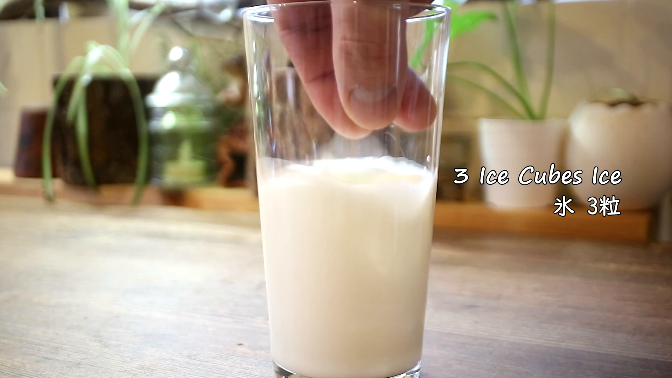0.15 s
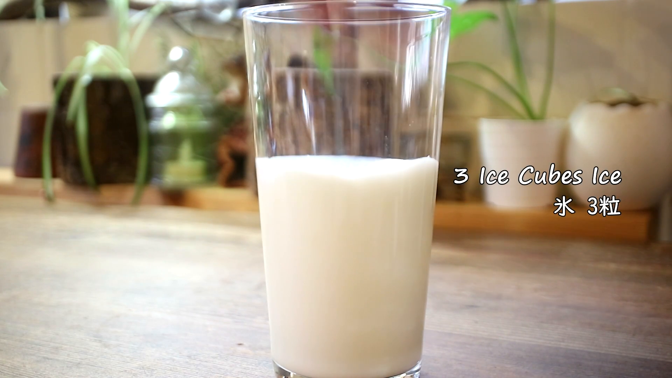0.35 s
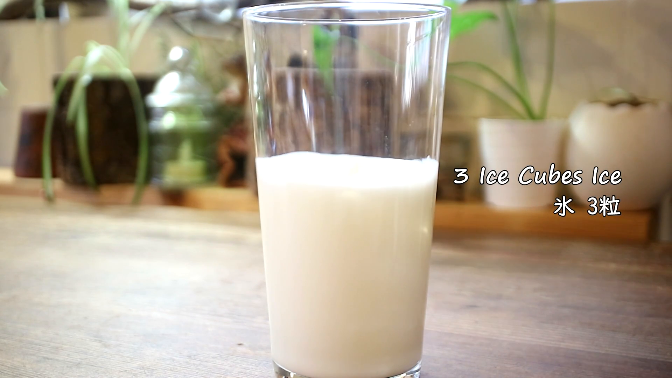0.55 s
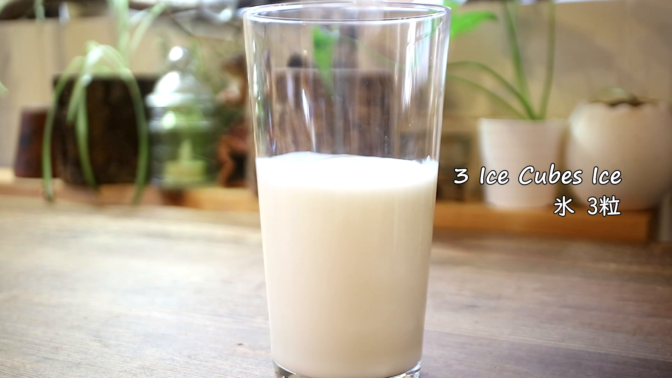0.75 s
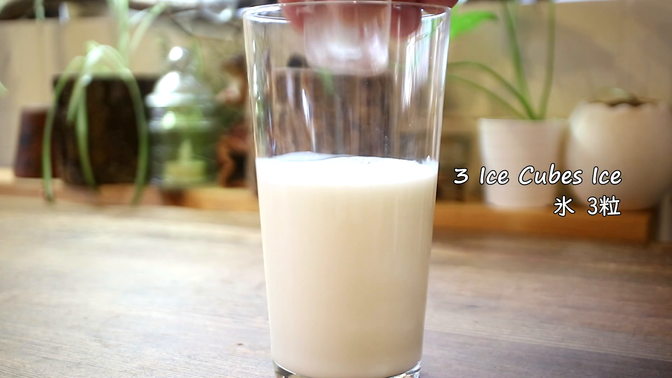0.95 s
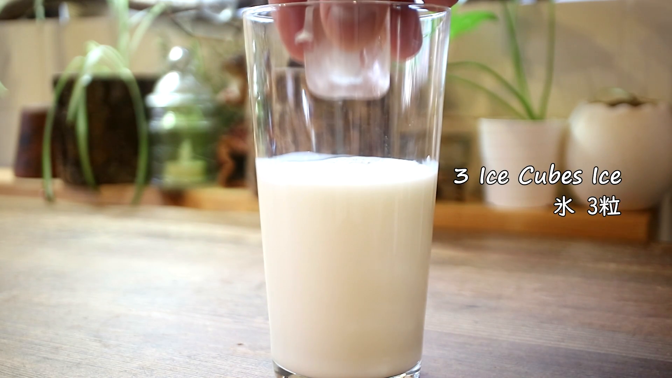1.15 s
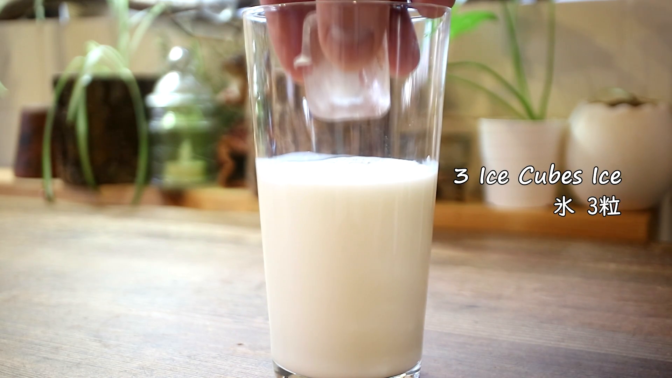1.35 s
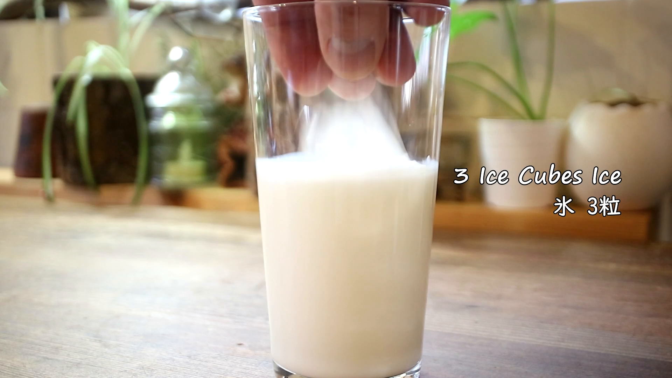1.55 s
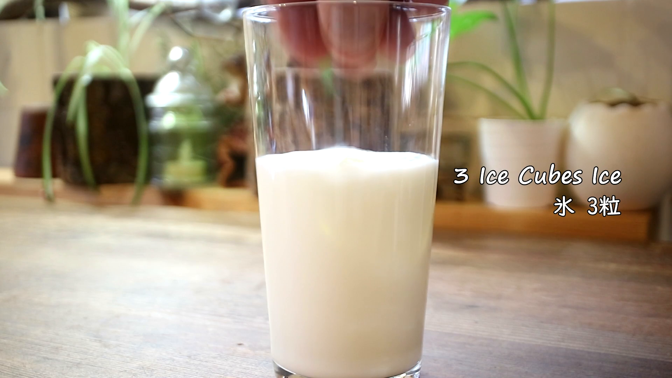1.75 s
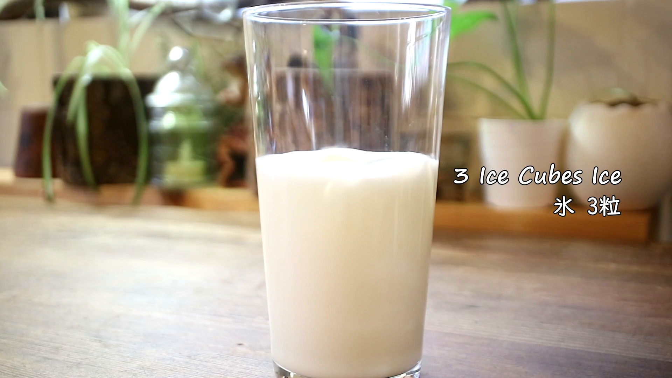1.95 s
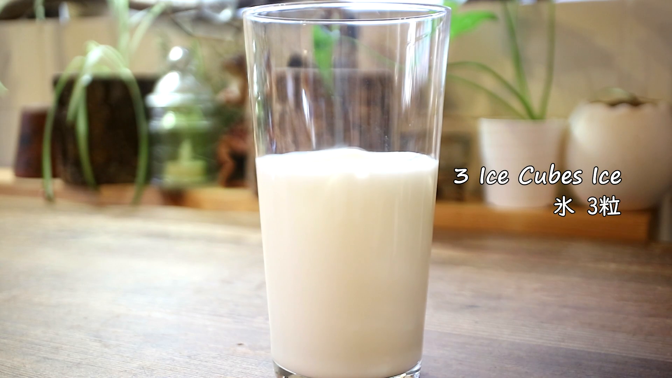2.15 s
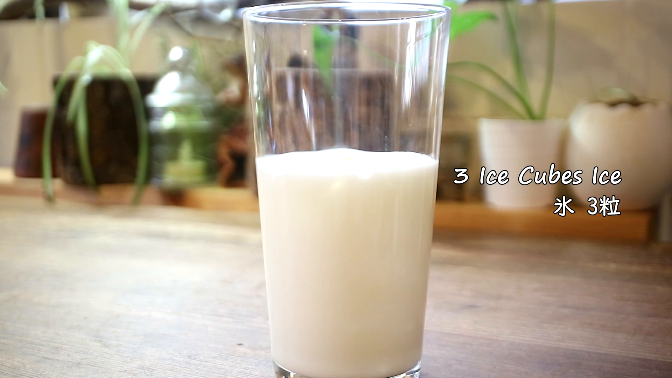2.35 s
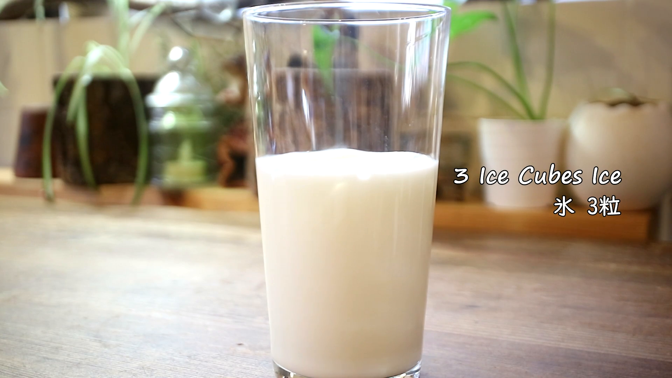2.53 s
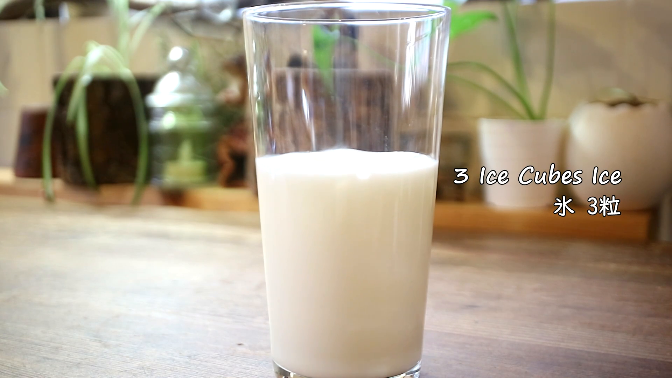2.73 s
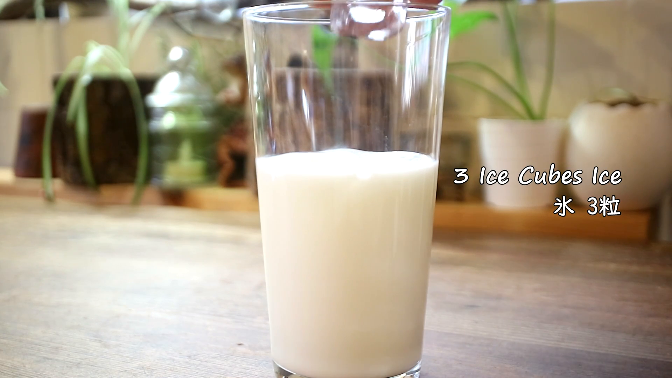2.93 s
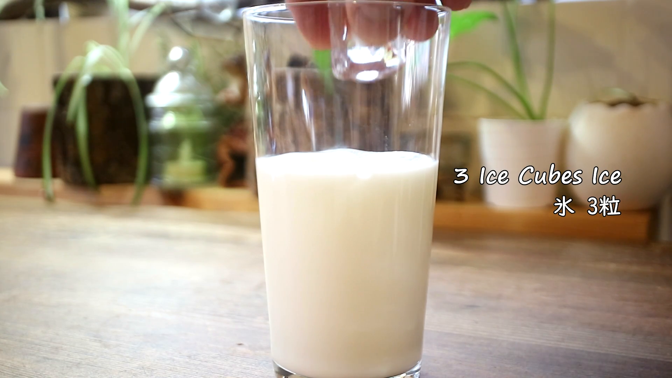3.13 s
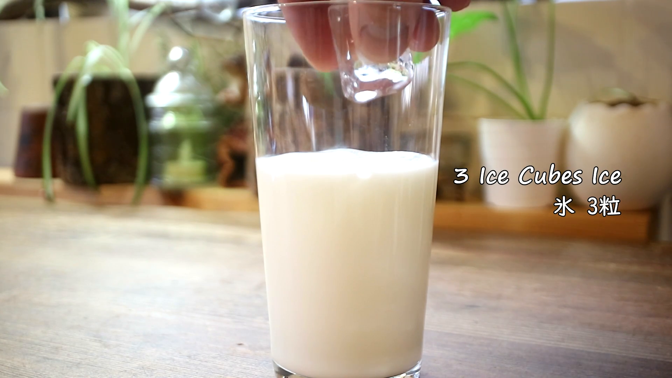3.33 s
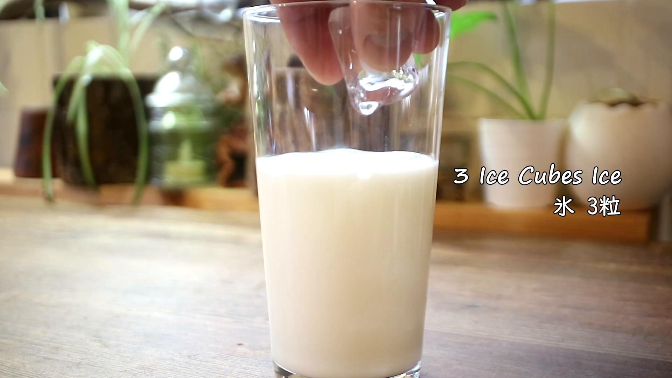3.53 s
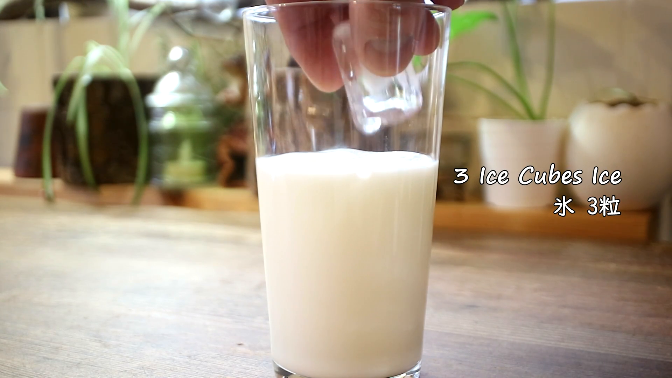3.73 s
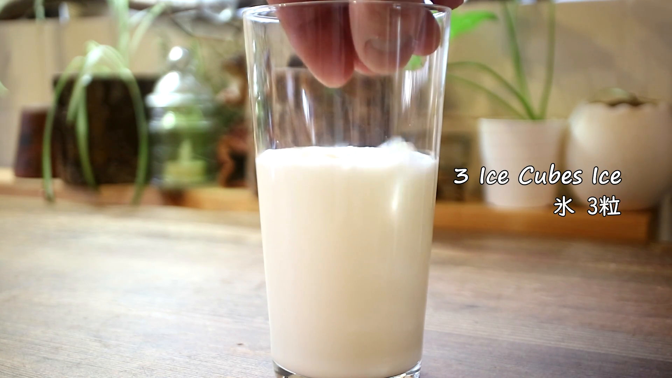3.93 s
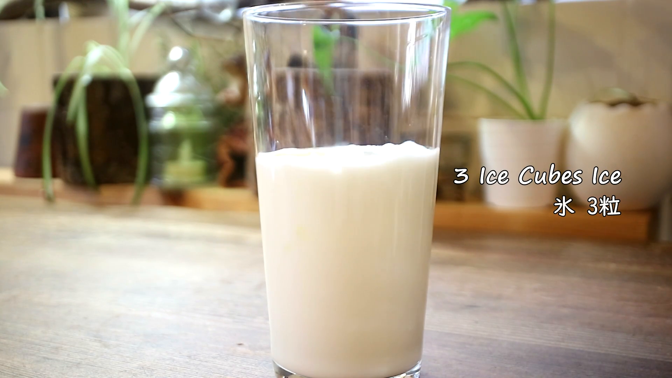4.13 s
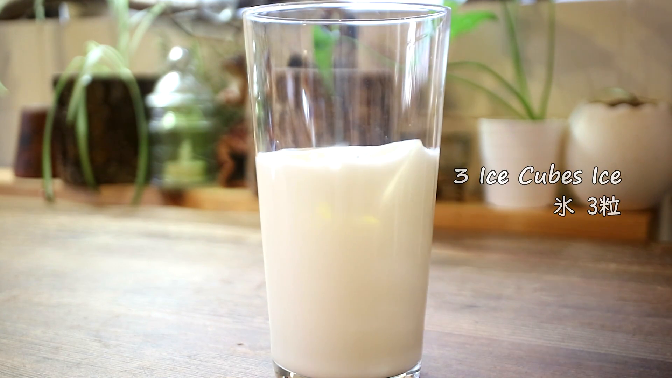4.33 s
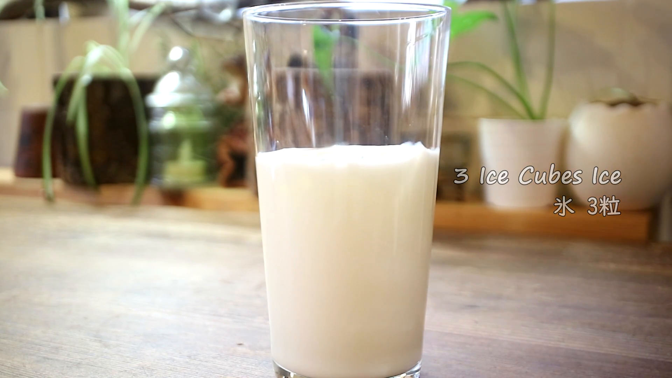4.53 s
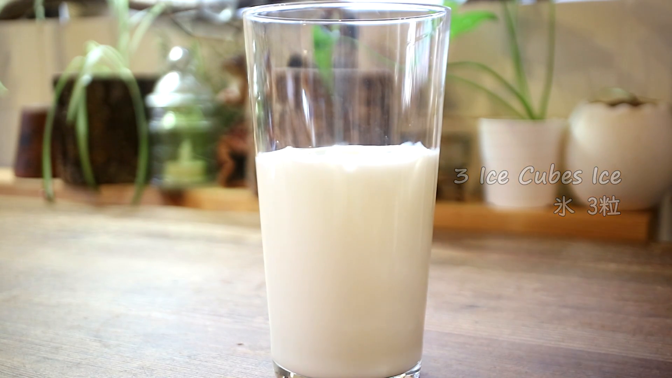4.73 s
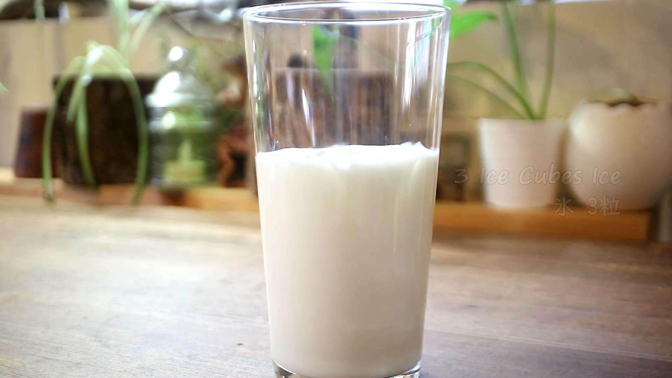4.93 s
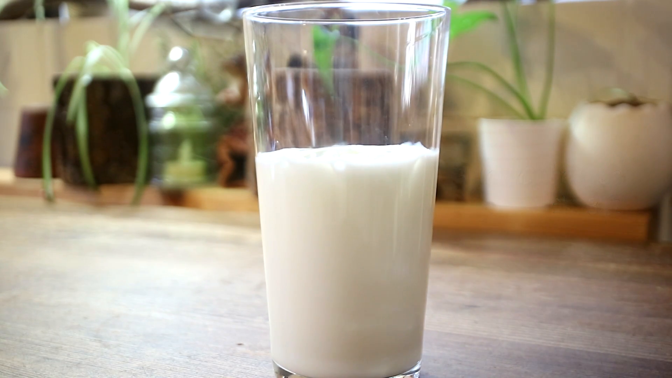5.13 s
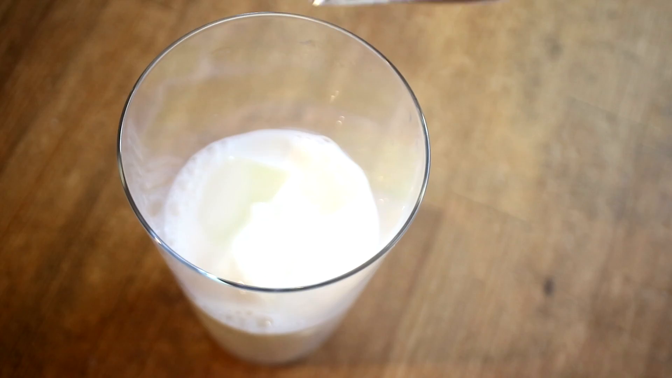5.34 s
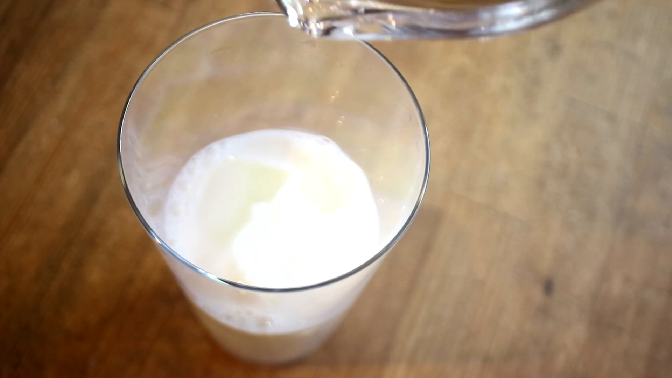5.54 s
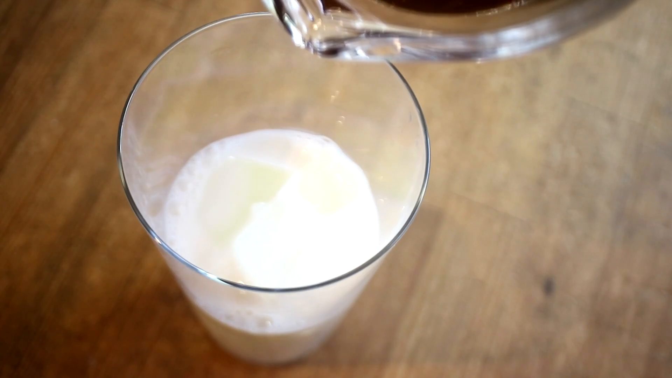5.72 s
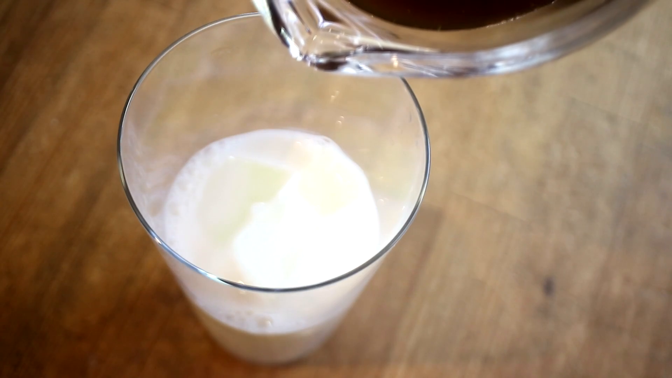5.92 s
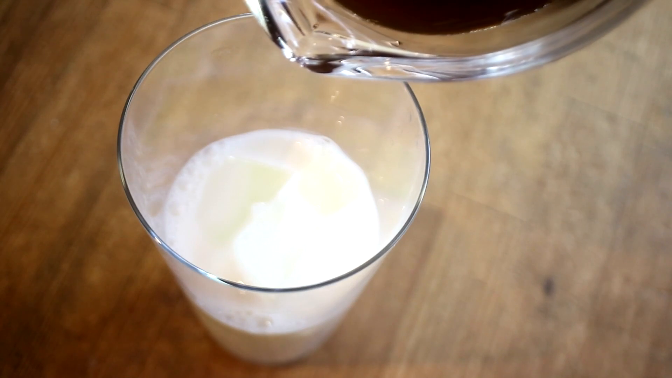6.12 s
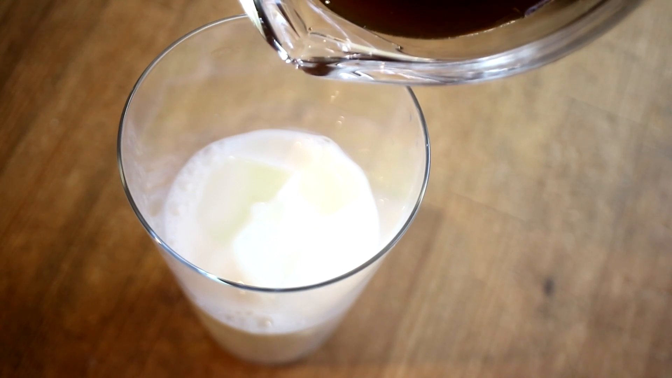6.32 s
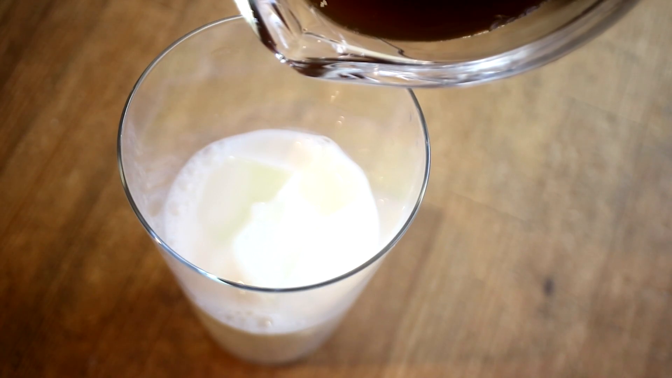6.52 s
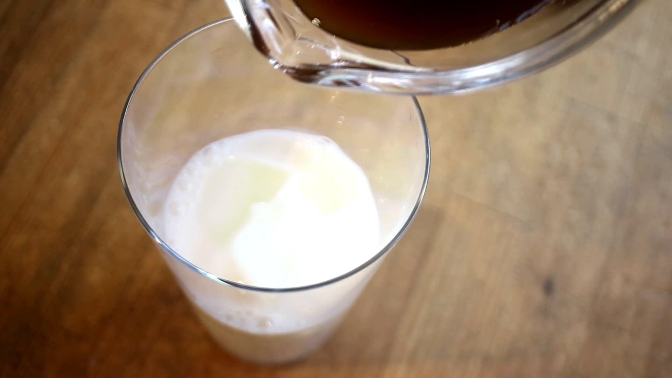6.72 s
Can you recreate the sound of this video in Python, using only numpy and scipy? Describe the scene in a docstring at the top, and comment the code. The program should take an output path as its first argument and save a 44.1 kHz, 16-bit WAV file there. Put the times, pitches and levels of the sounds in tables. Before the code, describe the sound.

Three ice cubes drop one at a time into a tall glass of milk. Each lands with a small splash and a quick cluster of bright, ringing clinks, then bobs against the glass with softer ticks while foam fizzes faintly. The second is the loudest and the third rattles longest. A few dull, distant knocks follow. The microphone is close, in a quiet kitchen with a low appliance hum.

```python
"""Three ice cubes splash one by one into a tall glass of milk on a kitchen table, each clinking as it bobs.
The glass rings on, swelling and dipping between clinks. The rising milk loads the glass and
flattens its pitch; the slosh makes it waver. Foam fizzes after each plunge.
Behind it, a quiet room with appliance hum and a few dull knocks, heard by a close mid-side microphone."""
import sys
import numpy as np
from scipy import signal
from scipy.fft import rfft, irfft, next_fast_len
from scipy.io import wavfile

SR = 44100
rng = np.random.default_rng(int(sys.argv[2]) if len(sys.argv) > 2 else 0)


def inscribe(sig):
    """Save sig as 16-bit PCM at rate SR to the path in sys.argv[1].

    A 1-D sig is mono; a 2-D sig holds one channel per row.
    Samples are clipped to [-1, 1] before scaling.
    """
    pcm = np.round(np.clip(np.atleast_2d(sig).T, -1, 1) * 32767)
    wavfile.write(sys.argv[1], SR, pcm.astype(np.int16))


N = 298689


def amp(db):
    return 10 ** (np.asarray(db) / 20)


def unit_rms(x):
    return x / np.sqrt(np.mean(x ** 2) + 1e-20)


def rise(t, rise_s):
    return 1 - np.exp(-t / rise_s)


def decay(t, db, t60_s):
    return amp(db - 60 * t / t60_s)


def spread(rows, width):
    """Three rows to stereo: centre plus width times left and right."""
    return rows[0] + width * rows[1:]


def along(points, hz):
    """Interpolate (freq_hz, value) points on a log axis."""
    freq_hz, value = np.transpose(points)
    return np.interp(np.log(hz + 1), np.log(freq_hz + 1), value)


def filtered(x, response):
    """Apply a frequency response."""
    size = next_fast_len(x.shape[-1] + 8192)
    return irfft(rfft(x, size) * response(np.fft.rfftfreq(size, 1 / SR)), size)[..., :x.shape[-1]]


def noise(shape, spectrum):
    """Coloured noise, rms 1."""
    return unit_rms(filtered(rng.standard_normal(shape), lambda hz: amp(along(spectrum, hz))))


def wobble(count, rate_hz):
    """Random curves, linear between knots."""
    knots = rng.standard_normal((count, int(N * rate_hz / SR) + 2))
    return np.array([np.interp(np.arange(N) * rate_hz / SR, np.arange(len(k)), k) for k in knots])


def add(into, start_s, sound):
    part = into[:, round(start_s * SR):][:, :sound.shape[-1]]
    part += sound[..., :part.shape[1]]


# freq_hz, density_db
AIR_MID_SPECTRUM = [(12, -29), (20, 0), (122, -6), (170, -10.5), (339, -10), (436, -15), (825, -19.5),
                    (1180, -23), (8980, -38), (15200, -60.5)]
AIR_SIDE_SPECTRUM = [(12, -72), (20, -38.5), (160, -8.5), (460, -3.5), (643, -11), (974, -5), (1180, -7.5),
                     (12200, -25), (15200, -50.5)]
# pitch_hz, width_hz, early_db, late_db
HUM_TONES = [(59.6, 5.3, -76.5, -76), (118.86, 24, -77, -72.5), (137.2, 11, -85.5, -73.5),
             (213.2, 12, -81, -91), (241, 10, -88, -85), (338.1, 10, -78.5, -84), (444, 20, -89.5, -83),
             (507.3, 19, -96.5, -81), (687, 5.4, -102, -86), (7760, 30, -106, -100)]


def room_tone(mid_db=-68, side_db=-71, hum_shift_s=5.4):
    """Separate mid and side hiss; appliance hum as narrow noise bands that shift balance once."""
    pitch_hz, width_hz, *levels_db = np.transpose(HUM_TONES)[..., None]

    def hum_response(hz):
        peaks = np.sqrt(SR / width_hz / np.pi * 2) / (1 + (2 * (hz - pitch_hz) / width_hz) ** 2)
        return [(amp(db) * peaks).sum(axis=0) for db in levels_db]

    early, late = filtered(rng.standard_normal(N), hum_response)
    blend = np.clip((np.arange(N) / SR - hum_shift_s) / 0.042, 0, 1)
    mid = amp(mid_db) * noise(N, AIR_MID_SPECTRUM) + early + (late - early) * blend
    left_lead = filtered(mid, lambda hz: 0.071 + 0.3j * hz / (hz + 600))
    side = amp(side_db) * noise(N, AIR_SIDE_SPECTRUM) + left_lead
    return np.array([mid + side, mid - side])


# freq_hz, t60_s
KITCHEN_DECAY = [(150, 0.4), (1000, 0.29), (4000, 0.24), (12000, 0.14)]


def kitchen_reverb(x):
    """Diffuse room tail; the treble dies first."""
    hz, t, bins = signal.stft(rng.standard_normal((2, SR // 2)), SR, nperseg=256)
    tail = signal.istft(bins * decay(t, 0, along(KITCHEN_DECAY, hz)[:, None]), SR, nperseg=256)[1]
    late = np.pad(x, ((0, 0), (300, 0)))
    return signal.fftconvolve(late, tail / np.linalg.norm(tail[0]), axes=1)[:, :N]


# start_s, level_db, pitch_hz, rise_s
KNOCKS = [(5.061, -57.5, 296, .009), (5.282, -48, 810, 0.048), (6.621, -63, 506, 0.0092)]


def far_knocks():
    """Dull short knocks somewhere in the room."""
    out, t = np.zeros((2, N)), np.arange(4096) / SR
    for start_s, db, hz, rise_s in KNOCKS:
        spectrum = [(hz / 6, -60), (hz / 2.1, -12), (hz, 0), (hz * 1.5, -14), (hz * 8, -70)]
        add(out, start_s, decay(t, db, 0.15) * rise(t, rise_s) * noise((2, len(t)), spectrum))
    return out


# start_s, level_db, pitch_hz, t60_s
DROPLETS = [(.878, -52.5, 2730, 0.013), (5.066, -60.5, 503, 0.054)]


def drips():
    """Lone droplets tick back into the milk."""
    out, t = np.zeros((2, N)), np.arange(2048) / SR
    for start_s, db, hz, t60_s in DROPLETS:
        add(out, start_s, decay(t, db, t60_s) * rise(t, 0.00038) * np.sin(2 * np.pi * hz * t))
    return out


# freq_hz, level_db
SPLASH_SPECTRUM = [(40, -29.5), (90, -3), (160, -2.5), (350, -6), (900, -10), (2500, -4), (5000, -13.5),
                   (11000, -26.5), (15000, -63.5)]
TABLE_SPECTRUM = [(70, -32.5), (120, -10.5), (155, 4.5), (200, -11), (350, -44), (800, -89)]
# start_s, splash_db, t60_s, pocket_hz, pocket_db, boom_db, foam_db, fizz_db, fizz_length_s
CUBE_PLUNGES = [(0.211, -47.5, 0.18, 244, -55.5, -60.5, -78.5, -83, 1.1),
                (1.649, -49, 0.17, 347, -44, -54.5, -67.5, -80.5, 1.16),
                (3.9219, -46, 0.31, 543, -47.5, -58.5, -75, -76.5, 1.56)]


def splashes():
    """Milk closes over each cube: spurts, small bubbles, a hollow air pocket, a boom in the table."""
    out, t, age_s = np.zeros((2, N)), np.arange(SR) / SR, np.arange(1024) / SR
    for start_s, db, t60_s, pocket_hz, pocket_db, boom_db, *_ in CUBE_PLUNGES:
        when, pitch, strength = rng.random((200, 3)).T[..., None]
        bubble_hz = 400 * 14 ** pitch
        cycles = bubble_hz * age_s
        chirps = np.sin(2 * np.pi * cycles * (1 + 0.017 * cycles))  # sharper near the surface
        blips = chirps * np.exp(-cycles / 2.7) * (1 - np.exp(-cycles)) * strength ** 3
        indices = (when * 0.24 * SR).astype(int) + np.arange(len(age_s))
        bubbles = np.bincount(indices.ravel(), blips.ravel(), len(t))
        rush = spread(noise((3, len(t)), SPLASH_SPECTRUM), 0.3)
        spurts = amp(4 * wobble(1, rate_hz=90)[:, :len(t)])
        onset = rise(t, 0.0012)
        add(out, start_s, decay(t, db, t60_s) * onset * (1.15 * spurts * rush + 9 * bubbles))
        pocket_spectrum = [(pocket_hz / 3, -60), (pocket_hz / 1.15, -12), (pocket_hz, 0),
                           (pocket_hz, -12), (pocket_hz * 3, -60)]
        add(out, start_s, decay(t, pocket_db, 0.3) * onset * noise(len(t), pocket_spectrum))
        add(out, start_s, decay(t, boom_db, 1.0) * rise(t, 0.03) * noise(len(t), TABLE_SPECTRUM))
    return out


# freq_hz, level_db
FOAM_SPECTRUM = [(300, -29.5), (800, 1), (2000, -1), (4000, -8), (8000, -15), (12000, -42.5)]
# centre_s, level_db, half_length_s
FOAM_RUSTLES = [(4.923, -76.5, 0.067), (5.302, -78, 0.018)]


def foam(peak_s=0.13, fizz_rise_s=0.12):
    """Foam bursts after each plunge, air from the ice fizzes on, the cubes rustle as they settle."""
    level, t = np.zeros(N), np.arange(N) / SR
    for start_s, *_, foam_db, fizz_db, length_s in CUBE_PLUNGES:
        age_s = np.maximum(t - start_s, 0)
        level += amp(foam_db) * (age_s / peak_s * np.exp(1 - age_s / peak_s)) ** 2
        level += amp(fizz_db) * rise(age_s, fizz_rise_s) * np.exp(-(age_s / length_s) ** 4)
    for centre_s, db, half_length_s in FOAM_RUSTLES:
        level += amp(db) * np.exp(-((t - centre_s) / half_length_s) ** 2)
    fizz = noise((3, N), FOAM_SPECTRUM) * amp(2 * wobble(3, rate_hz=79))
    return level * unit_rms(spread(fizz, 0.39))


# freq_hz, level_db
CLACK_SPECTRUM = [(300, -24), (800, -7), (1300, 3), (1800, -13.5), (2250, -1.5), (2700, -6.5), (3300, -9),
                  (6000, -18.5), (11000, -29), (15000, -54.5)]
SNAP_SPECTRUM = [(2000, -21.5), (5000, -5), (8000, 1.5), (11500, -14.5), (13000, -24.5), (15000, -40.5)]
THUD_SPECTRUM = [(60, -25), (150, -1.5), (400, -5), (800, -4), (1600, -15), (4000, -73.5)]
RUB_SPECTRUM = [(900, -30), (1600, -10), (2600, -9), (3350, 0), (4100, -2), (4800, -11), (7000, -30)]
# pitch_hz, over_clack_db, t60_s
CUBE_MODES = [(900, 1, 0.0065), (1510, -3, .005), (2480, 7, .005), (6253, 1, 0.0042), (2738, -13.5, 0.066)]
# clinks, faint ticks, and swells or dips of the glass ring
# start_s, clack_db, thud_db, ring_db of ten mode families, choke_db
# families: 1, 2, 3.4, 3.5, 4, 4.7, 5.5, 6.5, 7-8 kHz, top
GLASS_EVENTS = [(0.2142, -34, -49, -21.5, -42.5, -54, -39, -58, -34.5, -52.5, -60, -57, -50, 15.0),
                (0.2281, -48.5, -48.0, -27.0, -51.5, -52.5, -51.5, -46.5, -59.5, -60.5, -54, -54, -53.5, 40),
                (0.241, -33, -40, -28, -50, -43, -37.5, -46, -38.5, -50.5, -37.5, -44, -43.5, 8.3),
                (0.262, -41, -70, -50, -48, -64, -56, -59, -73, -66, -51, -52, -63.5, 19),
                (0.2791, -56, -62, -55, -59, -67, -65, -62, -59, -65, -54, -57, -62.5, 14),
                (0.3126, -64, -79, -45.0, -67, -67, -63, -63, -66, -69.0, -66.0, -58, -63.0, 9.0),
                (0.3603, -44.5, -49, -42.5, -56, -62, -44, -55.5, -52, -60.0, -70, -54, -68, 11),
                (0.381, -64.0, -65, -61, -53, -68, -52.5, -59, -65, -60, -77.5, -58, -73.5, 29),
                (0.429, -75.5, -65, -41.5, -58, -77.5, -69, -72, -72, -83.5, -80.0, -75.0, -79.5, 16.4),
                (0.4953, -74.5, -62, -59.5, -64, -72, -65.5, -65, -71, -80, -72, -68, -72.5, 23),
                (0.519, -68, -59.0, -48, -60, -68, -66, -71, -73.5, -78.5, -76.5, -66, -76.0, 15.0),
                (0.5507, -83.5, -71, -54.5, -74, -80.5, -80, -83, -84.5, -90.5, -83.5, -81.0, -85.0, 39),
                (0.6454, -60, -57, -59, -64, -90.5, -79, -75, -64, -76, -75.0, -78, -73, 11),
                (1.6471, -52, -70, -86, -85.5, -85.5, -85, -85, -86, -85.5, -85, -84, -75, 10),
                (1.6492, -25.5, -34, -49.5, -61.5, -60, -50, -35.5, -47, -61, -43.5, -46, -50, 12),
                (1.681, -36, -52, -32.5, -52.5, -39.5, -44, -44, -46, -41, -41, -49.0, -38, 18),
                (1.6964, -30, -43, -29.5, -45.5, -47, -45, -26.5, -38.5, -52, -47.0, -48, -35.5, 11),
                (1.7083, -42, -51, -31.5, -41, -56.5, -44, -39, -60, -57, -56, -55, -49.5, 34),
                (1.716, -40, -68, -46, -45.5, -35, -40, -43, -51, -52, -51, -40, -37, 13),
                (1.731, -38, -63, -48.5, -52, -42.5, -43, -54, -59.0, -64.5, -57, -50, -48, 15),
                (1.736, -36, -49, -54.5, -49.5, -43.5, -52, -49, -63, -62, -53.5, -48, -45, 11),
                (1.759, -54, -57, -46.5, -62, -65.5, -59.5, -68, -58.0, -62.5, -62.0, -51, -56.5, 10.5),
                (1.7843, -50, -63, -58, -60, -80, -62, -57.5, -53, -74.5, -67, -61, -64.0, 19),
                (1.8318, -46, -50.5, -52, -50, -40, -47, -49.5, -46, -60.5, -48, -52, -58.5, 13.0),
                (1.8681, -63, -69.0, -55, -55, -53, -51, -57, -61, -65, -62, -71, -69.5, 12),
                (1.919, -80.5, -81, -56, -57, -69, -75, -80, -82.0, -86, -98, -86.0, -87.5, 12),
                (2.0149, -62, -56, -55, -46.5, -66.5, -58.5, -65, -65, -63, -57, -57, -63, 12.7),
                (2.0329, -54, -54, -52, -65, -50, -53, -67.0, -61, -57, -61, -55.5, -60.5, 29),
                (2.0544, -72.5, -62, -61.5, -59, -56, -63.0, -80, -61, -78, -72, -66.5, -76, 10.8),
                (2.116, -61, -61.5, -49, -76.5, -65.5, -59, -57.5, -66, -70, -68, -68, -70.5, 18),
                (2.2346, -70.5, -77, -57, -79, -72.5, -59, -73, -82.0, -91, -85, -80.5, -86.5, 13.6),
                (2.2571, -70, -61, -61, -67, -81, -75.5, -78.0, -80, -82.0, -72, -75, -79.0, 12),
                (2.3553, -62, -60, -57, -67.5, -65, -56, -60.5, -65.0, -76, -67.5, -76, -64, 12),
                (3.9268, -37, -48.5, -28.5, -37, -26, -45, -37.5, -41.0, -45, -44, -26.5, -46, 11),
                (3.9455, -46, -53, -57, -47.5, -44.5, -60, -40.5, -44, -52, -44.5, -46, -50, 28),
                (3.9715, -40.5, -41, -38.5, -46.5, -45, -60, -52, -43, -59, -57, -53, -56.5, 7.9),
                (3.999, -49.5, -44.5, -70, -51.5, -55, -62, -46, -53, -63, -54, -59, -58.5, 22),
                (4.045, -71, -49, -53.5, -61, -63.5, -76, -66, -56, -77, -63, -61, -75, 19),
                (4.093, -52, -60, -46, -44.5, -33.5, -47, -45, -54.5, -60, -51, -39.5, -47, 12.0),
                (4.1116, -49.5, -80, -52.5, -42, -41, -46, -44.5, -53, -57.5, -51, -58, -66.5, 4.7),
                (4.171, -75.5, -76, -53, -41.5, -60.5, -48, -50, -56, -74.0, -71.0, -69.0, -71, 7.4),
                (4.213, -81, -76, -56.0, -66, -65, -68.5, -61, -60.5, -72.5, -60, -63, -68, 9.2),
                (4.2591, -93, -67.0, -73.5, -83, -77.5, -65, -64, -76, -79, -79, -84, -76.5, 23),
                (4.2879, -70, -73.0, -55, -53.5, -55.5, -55, -74, -71.5, -71.0, -58, -72, -67, 18),
                (4.337, -62, -62, -47.5, -60.5, -53.5, -55, -62, -64.5, -56.5, -50, -57, -61, 21),
                (4.3918, -46.5, -56, -47, -53.5, -49.5, -47, -53.5, -74, -56, -53, -65, -60, 16.3),
                (4.4176, -66, -61, -50.5, -62, -54, -54, -68, -80, -70.5, -62, -71, -66, 21),
                (4.433, -59, -61, -54, -67.5, -58, -58, -67, -72, -63, -69, -64, -68, 15),
                (4.4533, -74, -72, -92, -75, -80, -77.5, -79, -82.5, -82.0, -83, -78, -83, 29),
                (4.566, -56, -59, -72.5, -68.5, -60.5, -73, -66, -73.0, -72, -72, -74, -70.5, 9.0),
                (4.6901, -57, -56, -52, -58, -54.5, -58, -62, -59, -64, -64, -65, -64.5, 9.4),
                (4.7293, -73, -68.5, -56, -66, -80, -75, -80, -73, -78, -79.5, -73, -73, 25),
                (4.759, -80, -76, -91, -76, -86.0, -84.5, -88.5, -83.0, -90.5, -89.5, -86.5, -89, 22),
                (4.8483, -59, -60, -70, -76, -71, -75, -71, -75, -74.5, -76.0, -68, -69, 14),
                (4.885, -80, -75.5, -85, -82, -88, -87.5, -91, -88, -90, -90, -88, -89, 20)]


def clinks():
    """Clinks and faint ticks: a rub, the cube's short ring, a clack, a scratchy snap, a dull thud."""
    out, t = np.zeros((2, N)), np.arange(4096) / SR
    spectra = CLACK_SPECTRUM, SNAP_SPECTRUM, THUD_SPECTRUM, RUB_SPECTRUM
    noises = [noise((len(GLASS_EVENTS), 3, len(t)), spectrum) for spectrum in spectra]
    for event, clack, snap, thud, rub in zip(GLASS_EVENTS, *noises):
        start_s, clack_db, thud_db, *ring_db, top_db, _ = event
        cube_ring = sum(decay(t, clack_db + db + rng.normal(0, 1.3), t60_s) * np.sin(2 * np.pi * hz * t)
                        for hz, db, t60_s in CUBE_MODES)
        snap_level = decay(t, top_db - 1.5, 0.0066) + decay(t, top_db - 10, 0.08)
        clink = decay(t, ring_db[3] - 15, 0.13) * rise(t, 0.003) * spread(rub, 0.4)
        clink += cube_ring * (1 - np.exp(-(t / 0.0007) ** 2))
        clink += decay(t, clack_db - 3, 0.03) * rise(t, 0.00089) * spread(clack, 0.74)
        clink += snap_level * rise(t, 0.0004) * spread(snap, 0.54)
        clink += decay(t, thud_db - 1.5, 0.06) * rise(t, 0.00051) * spread(thud, 0.089)
        add(out, start_s, clink)
    return out


# one_cube_hz, two_cubes_hz, three_cubes_hz, level_db, t60_s, slosh_share, pan_db, left_lead_rad, rise_s
# last three rows: short-lived twins that beat
GLASS_MODES = [(1020, 989, 963, -1, 0.44, 1, 12, 1.9, 0.00062),
               (2018, 1965, 1941, 0.07, 0.53, .7, -1, 1.7, .008),
               (3586, 3424, 3352, 0.5, 0.13, 1, -3.5, 0.26, 0.00079),
               (3685, 3540, 3475, -2.5, 0.27, 1, -0.5, 0.33, 0.0012),
               (4130, 4030, 3933, 2, 0.19, 1, 0.4, 0.24, 0.00049),
               (5000, 4690, 4475, -4, 0.079, 1.3, 2.5, 0.305, 0.00051),
               (5505, 5439, 5410, -8, .12, .22, -3.5, 0.44, 0.0018),
               (6920, 6490, 6324, -2, .045, 1.1, 3.5, 1, 0.000981),
               (7320, 7290, 7200, 0.5, 0.035, .6, -0.5, 1.5, .0007),
               (7884, 7767, 7710, -6.5, 0.035, 0.33, 0, 0.69, .0007),
               (9220, 8863, 8739, 0, 0.03, 0.62, 1, 1.3, .0007),
               (9580, 9536, 9517, -11.5, 0.05, .1, 0.5, 0.79, .0007),
               (10500, 10350, 10283, -11.5, 0.047, .3, 1.04, 0.57, .0007),
               (11170, 10890, 10821, -7.5, .04, .3, 0, 0.99, .0007),
               (12096, 11923, 11846, -16, .04, .3, -1.5, 1.5, .0007),
               (14100, 13750, 13500, -13, .1, .7, 0.1, 1.3, .0007),
               (995, 962, 940, -10, .11, .8, 9, 2.1, .0008),
               (3440, 3308, 3500, -14, .03, 0.9, -2.5, .3, .0008),
               (4005, 3934, 3870, -7, .05, 0.89, 0.5, .3, 0.00073)]
# family_index per mode
MODE_FAMILY = [0, 1, 2, 3, 4, 5, 6, 7, 8, 8, 9, 9, 9, 9, 9, 9, 0, 2, 4]
# time_s, low_detune_pct, near_4khz_detune_pct, other_detune_pct
MILK_SLOSH = [(.212, 1.68, -0.1, 2.5), (.255, 0.76, -0.3, 1.3), (.33, 1.24, -0.2, 1),
              (.365, 0.53, -1.7, -1.7), (.45, -0.4, -0.8, -1.87), (.51, 0.07, 0.34, -0.04),
              (.7, 0.24, -.5, 0.03), (1.6, 0.05, 0.13, -0.1), (1.649, 4, .4, 2.5), (1.69, 2.5, 0.66, 0.83),
              (1.705, 0.86, -1.2, -0.2), (1.725, 1.5, 0.35, .5), (1.75, -0.65, -1.5, -0.6),
              (1.85, -1.3, -1.9, -0.77), (1.92, 0.14, -1.5, -1.6), (2.05, 0, -0.75, 0.1),
              (2.16, -0.13, -0.9, 0), (2.27, -0.2, 0.35, -0.14), (3.9, 0.08, -0.15, 0.14),
              (3.926, 3, 2.5, 2.5), (3.97, 2, 2.5, 3), (4.07, 1.53, 1.6, 2), (4.094, 0.64, 0.3, -0.04),
              (4.2, 0.73, 0.6, 0.16), (4.36, -.5, 0.2, .1), (4.8, 0.16, 0.9, 0.1)]


def glass_ring(choke_s=0.0043):
    """Each event damps and renews the wall modes; each cube lowers them, the slosh bends them."""
    out = np.zeros((2, N))
    *filled_hz, db, t60_s, share, pan_db, lead_rad, rise_s = np.transpose(GLASS_MODES)[..., None]
    hz = filled_hz[0]
    slosh_s, *detunes_pct = np.transpose(MILK_SLOSH)
    group = np.select([hz < 2500, abs(hz - 4050) < 200], [0, 1], 2)[:, 0]
    bend = np.array([np.interp(np.arange(N) / SR, slosh_s, pct) / 100 for pct in detunes_pct])
    sway = 0.0021 * wobble(len(hz), rate_hz=76)
    flicker_db = np.where(hz < 2500, 0.9, 3.4) * wobble(len(hz), rate_hz=95)
    side = np.array([[0.5], [-0.5]])
    stereo = amp(side * pan_db.T) * np.exp(1j * side * lead_rad.T)
    starts = [round(event[0] * SR) for event in GLASS_EVENTS]
    ringing = np.zeros(hz.shape, complex)
    for event, start, end in zip(GLASS_EVENTS, starts, starts[1:] + [N]):
        start_s, clack_db, _, *ring_db, choke_db = event
        span = slice(start, min(end, start + SR // 2))
        t = np.arange(span.stop - start) / SR
        softness_db = max(ring_db[0] - clack_db - 12, 0)  # ring without clack: the tone swells slowly
        onset = rise(t, rise_s * amp(1.6 * softness_db))
        fresh = amp(np.array(ring_db)[MODE_FAMILY, None] + db + rng.normal(0, 0.72, hz.shape))
        fresh = fresh * 1j * np.exp(1j * np.angle(ringing))  # in quadrature, so energies add
        kept = 1 - (1 - amp(-choke_db)) * rise(t, choke_s * amp(0.48 * softness_db))
        cubes = sum(start_s >= plunge[0] - 0.01 for plunge in CUBE_PLUNGES)
        pitch_hz = filled_hz[cubes - 1] * (1 + share * bend[group, span] + sway[:, span])
        phase_rad = 2 * np.pi * np.cumsum(pitch_hz, axis=1) / SR
        motion = (ringing * kept + fresh * onset) * decay(t, 0, t60_s) * np.exp(1j * phase_rad)
        out[:, span] = (stereo @ (motion * amp(flicker_db[:, span]))).imag
        ringing = motion[:, -1:]
    return out


def delayed(x, delay_s=0.0012):
    return np.pad(x, ((0, 0), (round(delay_s * SR), 0)))[:, :N]


def scene():
    ring = delayed(glass_ring())
    transients = delayed(clinks() + splashes() + drips())
    reverb = kitchen_reverb(amp(-10.5) * ring + amp(-7.5) * transients)
    return ring + transients + reverb + foam() + far_knocks() + room_tone()


# freq_hz, gain_db
MIC_TREBLE = [(11500, 0), (13000, -9), (15400, -12)]
LOW_CUT_HZ, TOP_HZ = 28, 15370


def record(dry):
    """Microphone: bass and treble roll-off, hard band limit."""
    def response(hz):
        low_cut = 1j * hz / (LOW_CUT_HZ + 1j * hz)
        return low_cut * amp(along(MIC_TREBLE, hz)) * (hz < TOP_HZ)

    return filtered(dry, response)


dry = scene()
out = record(dry)
inscribe(out)
```